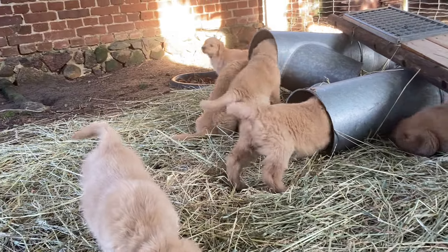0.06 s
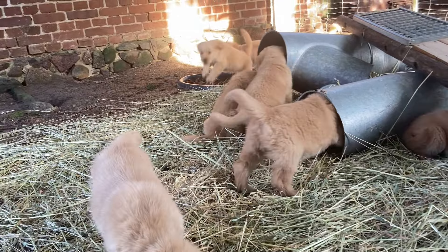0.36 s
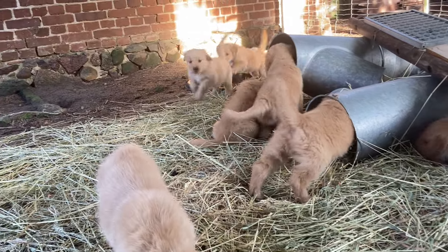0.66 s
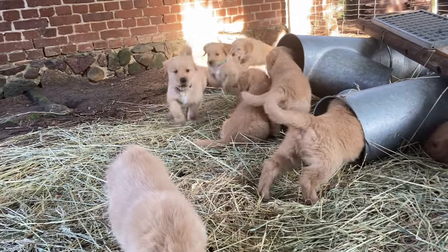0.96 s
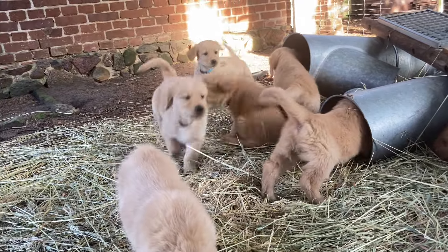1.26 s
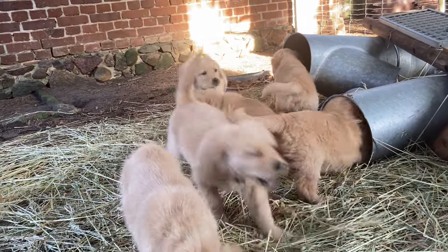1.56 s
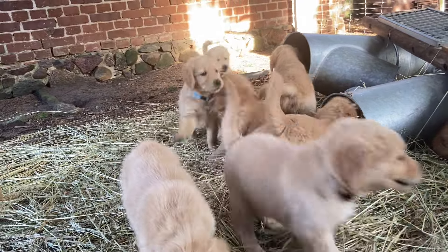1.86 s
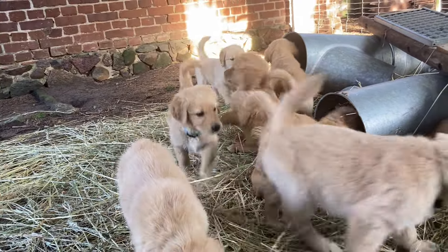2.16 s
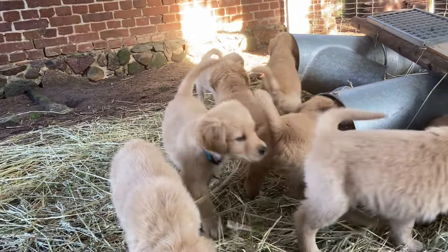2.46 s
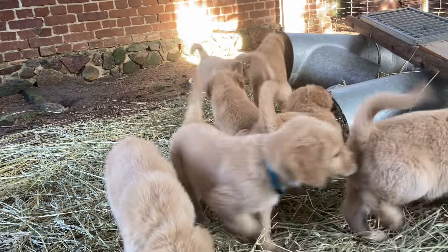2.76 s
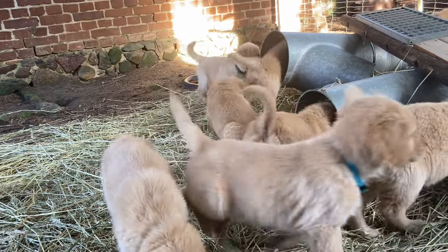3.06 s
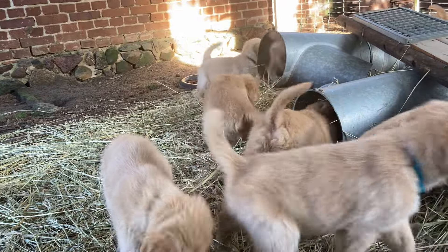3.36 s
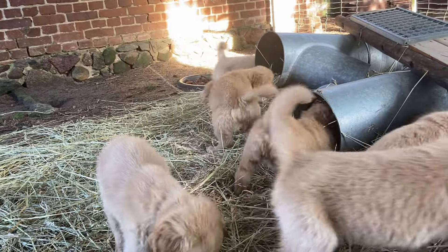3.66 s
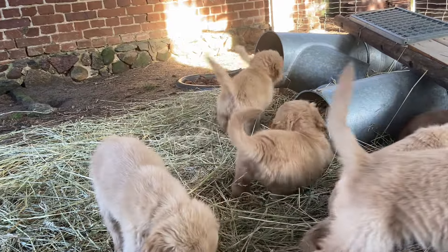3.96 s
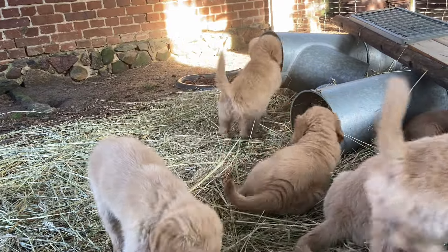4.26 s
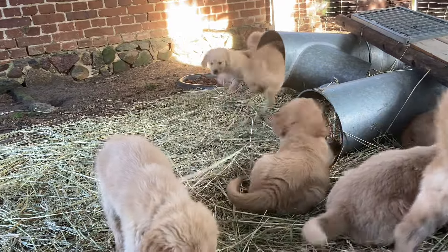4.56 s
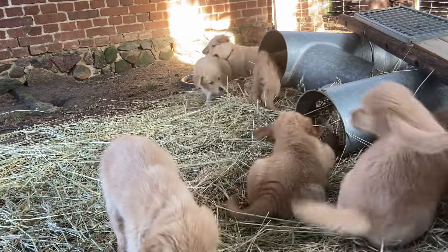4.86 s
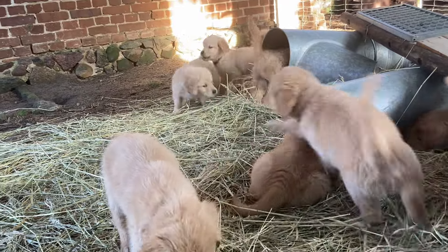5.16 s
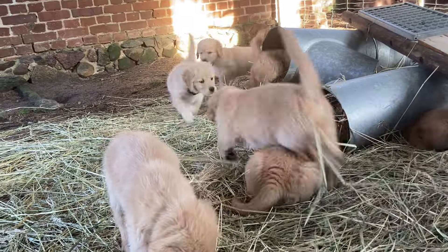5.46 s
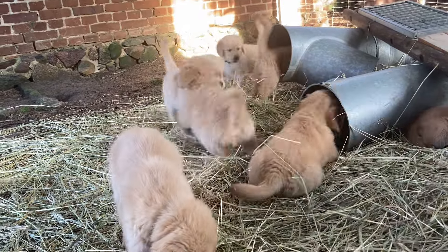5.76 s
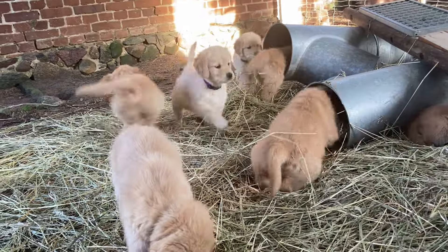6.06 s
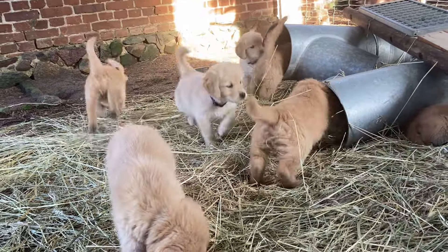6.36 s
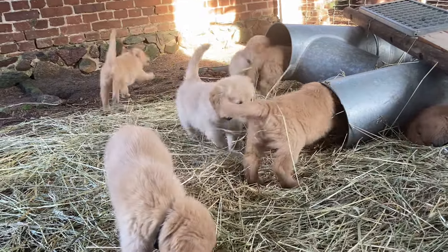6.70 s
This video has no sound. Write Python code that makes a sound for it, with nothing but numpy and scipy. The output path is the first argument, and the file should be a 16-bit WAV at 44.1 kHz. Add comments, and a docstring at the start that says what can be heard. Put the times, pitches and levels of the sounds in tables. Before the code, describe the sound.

Puppies romp on rustling, crackling hay close by, while paws and bodies bump a steel play tunnel farther off.

```python
"""A brick-walled pen in a barn, where puppies romp on hay close to the microphone.
Dry stalks rub and crackle under their paws, the bedding crunches, and now and then a stalk snaps.
Farther off, paws and bodies bump a sheet-steel play tunnel, which booms and knocks; claws clank
on its rim and scrape along it. The walls answer, over a faint steady rush of air."""
import sys
import numpy as np
from scipy import signal
from scipy.fft import rfft, irfft, next_fast_len
from scipy.io import wavfile
from scipy.ndimage import map_coordinates

SR = 44100
rng = np.random.default_rng(int(sys.argv[2]) if len(sys.argv) > 2 else 0)


def materialize(psi):
    """Save the field psi as 16-bit PCM at rate SR to the path in sys.argv[1].

    A 1-D psi becomes a single channel; in a 2-D psi each row is a channel.
    """
    bounded = np.clip(np.atleast_2d(psi).T, -1, 1)
    quanta = np.round(bounded * 32767).astype(np.int16)
    wavfile.write(sys.argv[1], SR, quanta)


N = 296783


def amp(db):
    """Decibels to gain."""
    return 10 ** (np.asarray(db) / 20)


def unit(x):
    """Scale to rms 1."""
    return x / np.sqrt(np.mean(x ** 2) + 1e-20)


def along(points, hz):
    """Read (frequency, value) points on a log frequency axis."""
    freqs, values = np.transpose(points)
    return np.interp(np.log(hz + 1), np.log(freqs), values)


def wobble(per_s):
    """A smooth random curve with per_s knots a second."""
    knots = rng.standard_normal(int(N * per_s / SR) + 4)
    return map_coordinates(knots, [np.arange(N) * per_s / SR])


def filtered(x, response):
    """Multiply the spectrum of x by a function of frequency."""
    n = x.shape[-1]
    padded = next_fast_len(n + 8192)
    return irfft(rfft(x, padded) * response(np.fft.rfftfreq(padded, 1 / SR)), padded)[..., :n]


def coloured(x, spectrum):
    """x shaped by a spectrum, at rms 1."""
    return unit(filtered(x, lambda hz: amp(along(spectrum, hz))))


def band(x, lo_hz, hi_hz):
    """Causal band-pass."""
    return signal.sosfilt(signal.butter(3, [lo_hz, hi_hz], "band", fs=SR, output="sos"), x)


def resonance(x, hz, q):
    """x through one resonance, with steep outer skirts."""
    return signal.lfilter(*signal.iirpeak(hz, q, fs=SR), band(x, hz / 2, min(hz * 3, 15000)))


def add(track, start_s, sound):
    """Mix a sound into a track."""
    part = track[..., max(0, round(start_s * SR)):][..., :sound.shape[-1]]
    part += sound[..., :part.shape[-1]]


# Width of the pen at the microphone: freq_hz, side_minus_mid_db
PEN_WIDTH = [(100, -15), (200, -14), (380, -6.5), (700, -3), (1300, -4.5), (2500, 1.5), (4500, 2),
             (9000, 2.5)]
# Its lean to one side: freq_hz, left_minus_right_db
PEN_LEAN = [(100, 1.5), (200, 2.5), (380, 0), (700, -1), (1300, -3.5), (2400, -1), (4400, 0.5), (8000, -2)]
def spread(pair):
    """Mid and side to left and right: bass is narrow, higher sound is wide."""
    mid, side = pair[0], filtered(pair[1], lambda hz: amp(along(PEN_WIDTH, hz)))
    stereo = np.array([mid + side, mid - side])
    return filtered(stereo, lambda hz: amp(np.outer([.5, -.5], along(PEN_LEAN, hz))))


# Share of the hay's treble common to both channels, slightly later and inverted on the right:
# freq_hz, power_share
SHARED_TREBLE = [(4000, .02), (5000, .15), (6000, .68), (8000, .97), (15000, .94)]
def from_left(paths, lag_s=.000307):
    """Three paths to stereo: top treble is later and inverted on the right; the rest is diffuse."""
    share = lambda hz: np.clip(along(SHARED_TREBLE, hz), 0, 1)
    lag = lambda hz: np.array([np.ones_like(hz), -np.exp(-2j * np.pi * lag_s * hz)])
    shared = filtered(paths[0], lambda hz: np.sqrt(share(hz)) * lag(hz))
    diffuse = filtered(paths[1:], lambda hz: np.sqrt((1 - share(hz)) / 2))
    return shared + spread(diffuse)


# Room tone, all around the microphone: freq_hz, density_db
AIR_SPECTRUM = [(20, -24), (50, 5.5), (80, 3), (160, 1.5), (400, -13.5), (1200, -14), (3000, -17.5),
                (8000, -51), (16000, -16)]
def air():
    """The faint steady rush of the barn."""
    return amp(-65) * spread(coloured(rng.standard_normal((2, N)), AIR_SPECTRUM))


# The litter's restless shuffling, close by: time_s, level_db
SHUFFLING = [(0.0, -55), (0.67, -55.5), (1.18, -48), (2.06, -46.5), (2.85, -49.5), (3.34, -43.5),
             (3.5, -52), (3.86, -50), (4.18, -52), (4.61, -51.5), (5.88, -49.5), (6.73, -49)]
# Paws landing on the near hay: landing_s, press_s, crackle_db, crunch_re_crackle_db
PAW_STEPS = [(.02, 0.075, -59, -15), (.175, 0.015, -53.5, -19), (0.291, 0.06, -68.5, 7.5),
             (0.607, 0.022, -54, -6.5), (0.743, 0.05, -53, -10.5), (0.928, 0.0082, -45, -14),
             (.965, 0.019, -42.5, -15), (1.055, 0.03, -51.5, -10), (1.15, 0.017, -46.5, -11.5),
             (1.205, 0.019, -42.5, -19), (1.375, 0.013, -54.5, -3.5), (1.449, 0.036, -47, -8.5),
             (1.535, 0.084, -46.5, -13), (1.705, 0.025, -51, -8.5), (1.785, 0.062, -41.5, -14.5),
             (1.925, 0.072, -51, -20), (2.02, 0.12, -51, -11.5), (2.163, 0.018, -42, -17),
             (2.341, 0.015, -43, -16), (2.41, 0.094, -47.5, -17), (2.613, 0.0085, -41, -15.5),
             (2.67, 0.027, -54, -16), (2.833, 0.017, -49, -6), (2.94, 0.02, -46.5, -22),
             (3.085, 0.17, -49, -35), (3.269, 0.034, -56, 4), (3.365, 0.027, -55.5, 4.5),
             (3.473, 0.01, -42.5, -19), (3.514, 0.0084, -63, 10.5), (3.65, 0.12, -55, -6.5),
             (3.801, 0.15, -50.5, -10.5), (3.921, 0.021, -44, -7.5), (3.986, 0.017, -70, -5),
             (4.297, 0.061, -53, -9.5), (4.476, 0.022, -47, -10), (4.625, 0.092, -43.5, -12),
             (4.755, 0.11, -52, -8), (4.87, 0.035, -48.5, -15.5), (5.061, 0.1, -55.5, -8),
             (5.189, 0.0058, -44.5, -11), (5.303, 0.054, -47, -13), (5.458, 0.033, -43.5, -16),
             (5.53, 0.025, -47.5, -18), (5.655, 0.12, -46.5, -16.5), (5.785, 0.07, -52, -9.5),
             (5.901, 0.032, -43.5, -14.5), (5.97, 0.012, -53, -5.5), (6.144, 0.048, -45, -13),
             (6.255, 0.023, -50, -15.5), (6.33, 0.038, -42, -13), (6.42, 0.054, -53, -13)]
def trampling(sink_s=.027, release_db_per_s=183):
    """Gains of crackle and crunch: over the shuffling, each paw sinks in, presses and lets go."""
    t = np.arange(N) / SR
    shuffle_db = np.interp(t, *np.transpose(SHUFFLING))
    fidget_db = wobble(per_s=17)
    crackle_power = amp(shuffle_db - 2.5 + fidget_db) ** 2
    crunch_power = crackle_power * amp(-15.5) ** 2
    for landing_s, press_s, crackle_db, crunch_db in PAW_STEPS:
        sink = np.clip((t - landing_s) / sink_s + .5, 0, 1)
        step = sink * amp(crackle_db - release_db_per_s * np.maximum(t - landing_s - press_s, 0))
        crackle_power += step ** 2
        crunch_power += (amp(crunch_db) * step) ** 2
    return np.sqrt(crackle_power), np.sqrt(crunch_power)


def fractures(count, scatter_db, life_s):
    """Countless tiny fractures, each a noise burst of its own size, heard along three paths."""
    age = np.arange(48)
    at = rng.integers(0, N, count)[:, None] + age
    size = amp(scatter_db * np.minimum(rng.standard_normal((count, 1)), 2.8))
    bursts = rng.standard_normal((3, count, len(age))) * size * np.exp(-age / SR / life_s)
    return unit(np.array([np.bincount(at.ravel(), path.ravel(), N)[:N] for path in bursts]))


def bundles(per_s=55, scatter_db=3.8, settle_s=.008, re_steady_db=-3.3):
    """Gain of the rustle: bundles of stalks give way abruptly, at random, and soon settle."""
    count = int(per_s * N / SR)
    size = amp(scatter_db * np.minimum(rng.standard_normal(count), 1.5))
    jolts = np.bincount(rng.integers(0, N, count), size ** 2, N)
    power = signal.lfilter([1], [1, -np.exp(-1 / (settle_s * SR))], jolts)
    return unit(np.sqrt(1 + amp(re_steady_db) ** 2 * power / power.mean()))


def bending_stalks(count, pitch_hz, decay_cycles, run_s):
    """Each bending stalk gives a quick run of four ticks that ring at its own pitch."""
    age = np.arange(256)
    detune, size = np.clip(rng.standard_normal((2, count, 1, 1)), -2.3, 2.3)
    cycles = pitch_hz * 2 ** (.3 * detune) * age / SR
    onsets = N * rng.random((count, 1, 1)) + SR * run_s * rng.random((count, 4, 1))
    at = onsets.astype(int) + age
    ring = np.sin(2 * np.pi * (cycles + rng.random((3, count, 4, 1))))
    ticks = amp(2.3 * size) * np.exp(-cycles / decay_cycles) * ring
    return unit(np.array([np.bincount(at.ravel(), path.ravel(), N)[:N] for path in ticks]))


# Bright crackle of dry stalks at close range: freq_hz, density_db
CRACKLE_SPECTRUM = [(2500, -47), (5000, -36), (6500, 0.5), (8300, 4), (11300, 4.5), (13000, 2.5),
                    (15500, -2.5)]
# Duller crunch of the bedding beneath: freq_hz, density_db
CRUNCH_SPECTRUM = [(100, -2.5), (400, 0), (800, -1), (1300, 1.5), (2000, 1), (3000, -2), (4500, 0),
                   (6000, -3), (9000, -4.5), (15000, -43)]
def hay():
    """Paws press the bedding: stalks rub and bend, a few tick out, and the layer beneath crunches."""
    crackle_gain, crunch_gain = trampling()
    rubbing = fractures(count=50000, scatter_db=2, life_s=.0006)
    ticking = fractures(count=420, scatter_db=2.8, life_s=.0003)
    pressing = fractures(count=35000, scatter_db=3, life_s=.0008)
    buckling = fractures(count=700, scatter_db=3, life_s=.0005)
    giving = bundles()
    fine = rubbing * giving + amp(-8.5) * ticking
    coarse = pressing * np.sqrt(giving) + amp(-11) * buckling
    crackle = coloured(fine, CRACKLE_SPECTRUM) * crackle_gain
    crunch = amp(3) * coloured(coarse, CRUNCH_SPECTRUM) * crunch_gain
    stalks = bending_stalks(count=1250, pitch_hz=4400, decay_cycles=3.3, run_s=.012)
    bending = amp(-7.5) * giving * stalks * np.sqrt(crackle_gain * crunch_gain)
    return from_left(crackle + crunch + bending)


# Modes of the steel tunnel: pitch_hz, level_db, t60_s
STEEL_MODES = [(52, -4, 0.41), (64.7, -4, 0.39), (95.3, -2.5, 0.32), (113.5, -4, 0.3), (144.7, -2.5, 0.33),
               (176.2, -2.5, 0.24), (224.8, 1.5, 0.11), (261, 2, 0.13), (323, -6, 0.25), (393, -7, 0.44),
               (447, 3, 0.095), (476.3, 5, 0.14), (541.6, -3, 0.23), (614, -4.5, 0.15), (696, -10.5, 0.24),
               (858, -3.5, 0.14), (897, -5, 0.22), (1061, -0.5, 0.099), (1192, -10, .19), (1322, 4, 0.11),
               (1804, -3, 0.13)]
def steel_ring(t, boom_hz, favour_db=10, favour_octaves=.26):
    """Each bump rings the modes at new strengths; the spot it hits favours those near boom_hz."""
    hz, mode_db, t60_s = np.transpose(STEEL_MODES)[:, :, None]
    strength, detune = rng.standard_normal((2, 2, len(hz), 1))
    phase = rng.uniform(0, 2 * np.pi, (2, len(hz), 1))
    loaded_hz = hz * (1 + .016 * detune)  # the puppy's weight detunes the shell
    boost_db = favour_db * np.exp(-(np.log2(hz / boom_hz) / favour_octaves) ** 2)
    envelope = amp(mode_db + boost_db + 2.8 * strength - 60 * t / t60_s)
    return np.sum(envelope * np.sin(2 * np.pi * loaded_hz * t + phase), axis=1)


# Bumps on the tunnel, farther off, each band trimmed below: start_s, knock_db, boom_db, boom_hz
TUNNEL_BUMPS = [(0.024, -59.5, -56.5, 136), (0.217, -43, -56.5, 176), (0.289, -48, -59, 151),
                (0.323, -38, -51, 303), (0.335, -30, -36, 150), (0.639, -52.5, -61.5, 179),
                (0.743, -46.5, -51.5, 215), (0.775, -49.5, -50.5, 180), (0.882, -32, -47, 147),
                (1.025, -69, -56.5, 93), (1.077, -41.5, -56, 116), (1.142, -39, -50, 183),
                (1.21, -29, -42.5, 145), (1.257, -44, -53, 257), (1.358, -43.5, -49.5, 124),
                (2.105, -56, -62, 124), (2.843, -47, -58.5, 272), (2.871, -54, -57.5, 66),
                (2.93, -59, -62, 136), (3.154, -49.5, -50.5, 146), (3.23, -41, -63, 252),
                (3.25, -47.5, -41.5, 98), (3.368, -29.5, -53, 232), (3.39, -53, -39.5, 116),
                (3.467, -38.5, -41.5, 113), (3.643, -33.5, -43, 234), (3.649, -50, -43, 145),
                (3.655, -55, -50, 65), (3.928, -45, -46.5, 215), (3.975, -46.5, -48.5, 102.6),
                (4.194, -50.5, -59, 200), (4.287, -52, -45, 200), (4.334, -47, -47, 109),
                (4.478, -46, -56, 77), (4.773, -48, -51, 163), (5.078, -70, -56.5, 84.6),
                (5.193, -75, -58.5, 124), (5.981, -76, -61.5, 138), (6.151, -55, -46, 202),
                (6.165, -72, -49.5, 96), (6.417, -74, -53, 167), (6.485, -76, -61.5, 90),
                (6.593, -75, -63, 138)]
def tunnel_bumps(rock_s=.047):
    """Soft bodies boom, paws knock, the sheet rings above; then the tunnel rocks back more softly."""
    track, t = np.zeros((2, N)), np.arange(int(.6 * SR)) / SR
    unit_onset = lambda x: x / np.sqrt(np.mean(x[:, :SR // 25] ** 2, axis=1, keepdims=True))
    rocks = [(start_s + rock_s, knock_db - 15, boom_db - 9.5, boom_hz)
             for start_s, knock_db, boom_db, boom_hz in TUNNEL_BUMPS]
    # the hay soon damps the sheet's dense modes; a faint rattle lingers
    thud, rattle = amp(20 - 60 * t / .04), amp(5.5 - 60 * t / .42)
    for start_s, knock_db, boom_db, boom_hz in TUNNEL_BUMPS + rocks:
        ring = steel_ring(t, boom_hz)
        dense_modes = rng.standard_normal((2, len(t))) * (thud + rattle)
        # fur cushions gentle contacts, which swell slowly; hard ones start at once
        attack_s = min(.0016 * amp(-.8 * (knock_db + 40)), .012)
        blow = (ring + dense_modes) * (1 - np.exp(-t / attack_s))
        bass = band(blow, min(.5 * boom_hz, 140), 252)
        boom = unit_onset(bass * (1 - np.exp(-t / .0039)))
        knock = unit_onset(band(blow, 267, 874))
        high_ring = amp(-15) * unit_onset(band(blow, 1220, 2340))
        add(track, start_s, amp(boom_db + 2) * boom + amp(knock_db - 12.5) * (knock + high_ring))
    return spread(track)


# Single stalks breaking near the microphone: start_s, level_db
STALK_SNAPS = [(0.103, -29.5), (0.1835, -25.5), (0.5044, -31), (0.754, -33), (0.795, -27), (0.885, -28),
               (1.449, -18.5), (1.4824, -19.5), (1.537, -20), (1.778, -16.5), (1.8001, -8), (2.1323, -13),
               (2.561, -22.5), (2.611, -16.5), (2.696, -29), (2.802, -27), (3.0515, -28), (3.149, -31),
               (3.221, -26), (3.424, -20), (5.2968, -19.5), (5.4696, -23), (5.516, -24), (5.9198, -27),
               (6.3627, -13), (6.703, -26)]
def snaps(rise_s=.0006, splinter_t60_s=.05):
    """A stalk breaks in about a millisecond, splinters trail off; strong snaps crack lower too."""
    track, t = np.zeros((3, N)), np.arange(SR // 30) / SR
    breaking = (t / rise_s * np.exp(1 - t / rise_s)) ** 2
    splinters = amp(-27 - 60 * t / splinter_t60_s)
    unit_energy = lambda x: x / np.linalg.norm(x, axis=1, keepdims=True)
    strongest_db = max(level_db for _, level_db in STALK_SNAPS)
    for start_s, level_db in STALK_SNAPS:
        burst = rng.standard_normal((3, len(t))) * (breaking + splinters)
        tick = unit_energy(band(burst, 6500, 14000))
        crack = unit_energy(band(burst, 2500, 6500))
        crack_re_tick_db = -38 + .29 * (level_db - strongest_db)
        add(track, start_s, amp(level_db + 1.5) * (tick + amp(crack_re_tick_db) * crack))
    return from_left(track)


def strikes(rows, channels, life_s, q):
    """Short hard contacts, each ringing at its own pitch, levelled over the first 40 ms."""
    track, t = np.zeros((channels, N)), np.arange(SR // 5) / SR
    for start_s, level_db, pitch_hz in rows:
        burst = rng.standard_normal((channels, len(t))) * np.exp(-t / life_s)
        ring = resonance(burst, pitch_hz, q)
        add(track, start_s, amp(level_db) * ring / ring[:, :SR // 25].std(axis=1, keepdims=True))
    return track


# Claws on the tunnel's rim, farther off: start_s, level_db, pitch_hz
RIM_CLANKS = [(.219, -67, 940), (.291, -55, 980), (.321, -49.5, 960), (.338, -48.5, 885),
              (.339, -57.5, 2600), (.881, -59.5, 760), (1.21, -51, 890), (3.367, -48.5, 1120),
              (3.927, -53, 1140)]
def clanks():
    """A hard claw strikes the steel rim, which rings briefly."""
    return spread(strikes(RIM_CLANKS, channels=2, life_s=.013, q=4))


# Thick stalks in the near hay: start_s, level_db, pitch_hz
STALK_CRACKS = [(1.7773, -70, 5420), (1.7998, -52, 4840), (2.133, -61, 4770), (2.355, -59.5, 3300),
                (2.3765, -61, 3030), (3.518, -61, 2750), (5.467, -65, 3700)]
def cracks():
    """A thick stalk cracks with a brief ring."""
    return from_left(strikes(STALK_CRACKS, channels=3, life_s=.0018, q=4.5))


# Claws dragging over at the tunnel: start_s, length_s, final_level_db, pitch_hz
CLAW_SCRAPES = [(3.694, 0.32, -62.5, 1240), (4.21, 0.091, -63.5, 1170), (4.417, 0.12, -59, 1290)]
def scrapes(grip_s=.01, lift_s=.04):
    """Claws stick and slip along the steel, harder and harder, then lift."""
    track, t = np.zeros((2, N)), np.arange(N) / SR
    slips = fractures(count=5000, scatter_db=4, life_s=.0005)[:2]
    for start_s, length_s, level_db, pitch_hz in CLAW_SCRAPES:
        force = np.interp(t - start_s, [0, grip_s, length_s, length_s + lift_s], [0, .4, 1, 0])
        track += amp(level_db) * force * unit(resonance(slips, pitch_hz, q=5.3))
    return spread(track)


# Reverberation between the brick walls: freq_hz, t60_s
WALL_DECAY = [(100, .33), (500, .4), (3000, .38), (12000, .2)]
def walls(x, delay_samples=400):
    """The walls answer the left channel a moment later; each frequency dies at its own speed."""
    hz, t, noise = signal.stft(rng.standard_normal((2, SR // 2)), SR, nperseg=256)
    decay = amp(-60 * t / along(WALL_DECAY, hz)[:, None])
    _, tail = signal.istft(noise * decay, SR, nperseg=256)
    delayed = np.pad(x[0], (delay_samples, 0))[None]
    return spread(signal.fftconvolve(delayed, tail / np.linalg.norm(tail[0]), axes=1)[:, :N])


def scene():
    """Near hay is almost dry; the tunnel, farther off, carries more of the room."""
    straw, steel = hay() + snaps(), tunnel_bumps()
    straw += cracks()
    steel += clanks() + scrapes()
    room = amp(-20) * walls(straw) + amp(-9.5) * walls(steel)
    return straw + steel + room + air()


def record(dry):
    """The camera keeps nothing above its band limit."""
    return filtered(dry, lambda hz: hz < 15870)


dry = scene()
out = record(dry)
materialize(out)
```